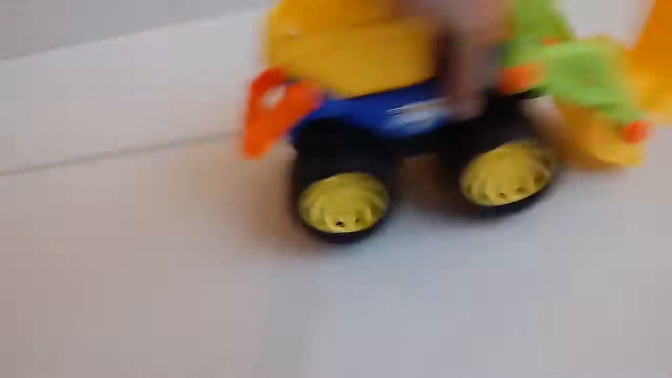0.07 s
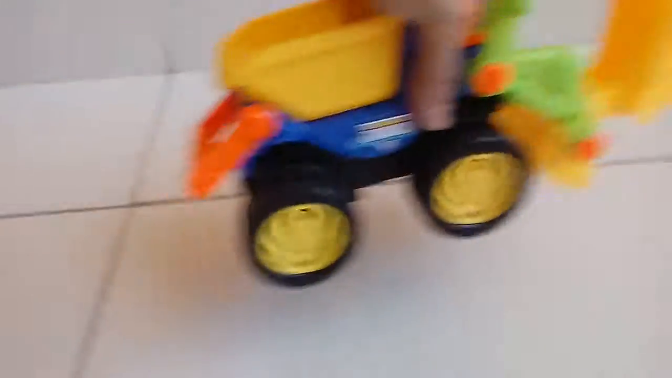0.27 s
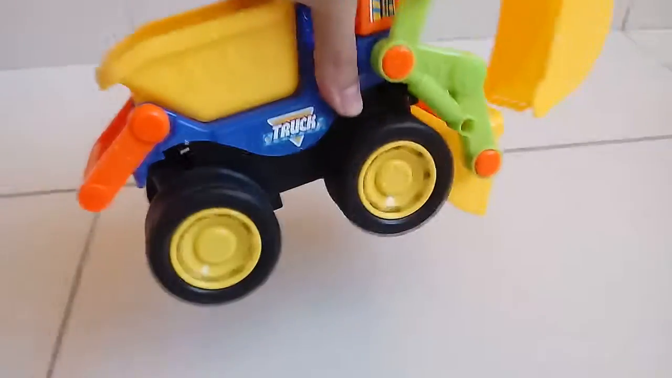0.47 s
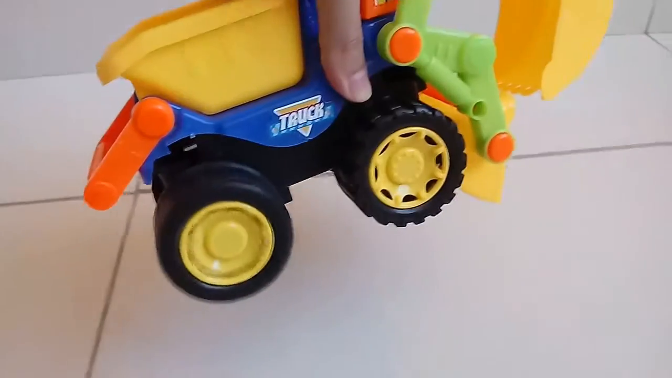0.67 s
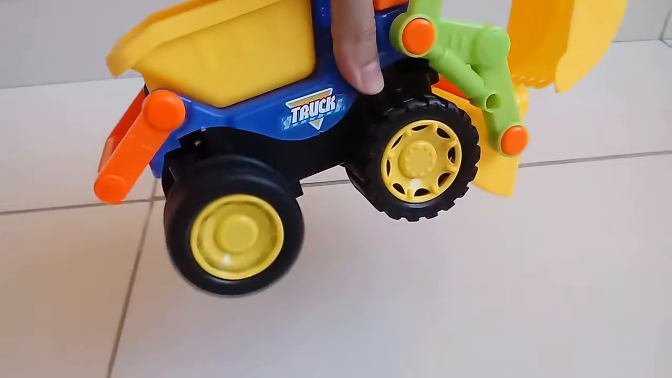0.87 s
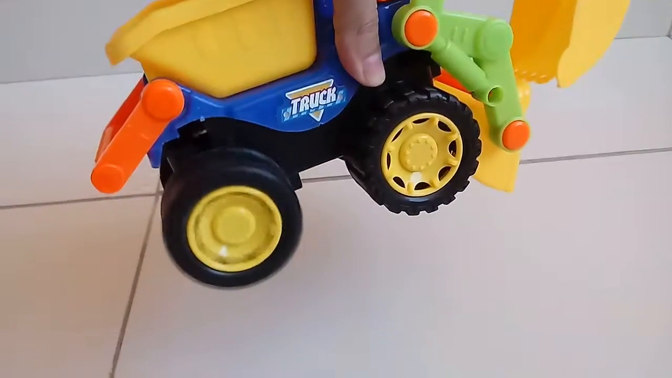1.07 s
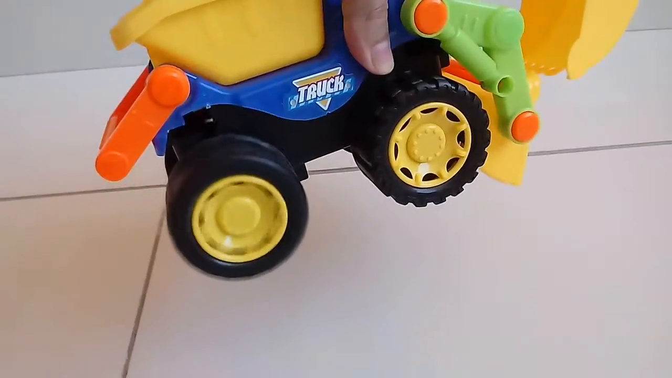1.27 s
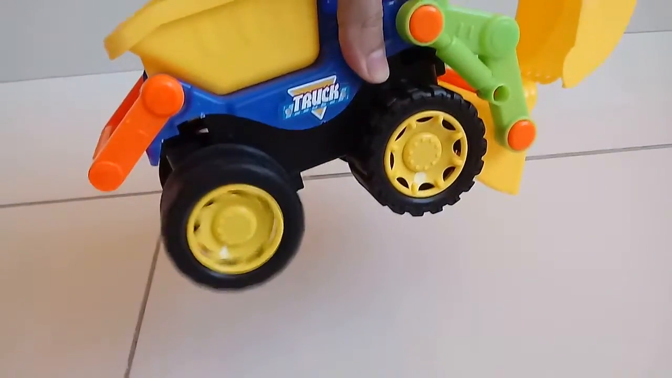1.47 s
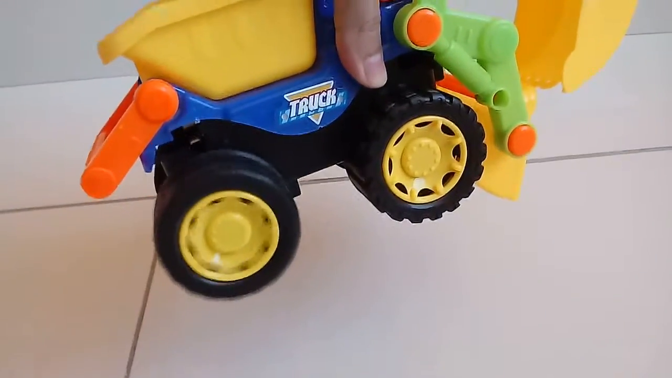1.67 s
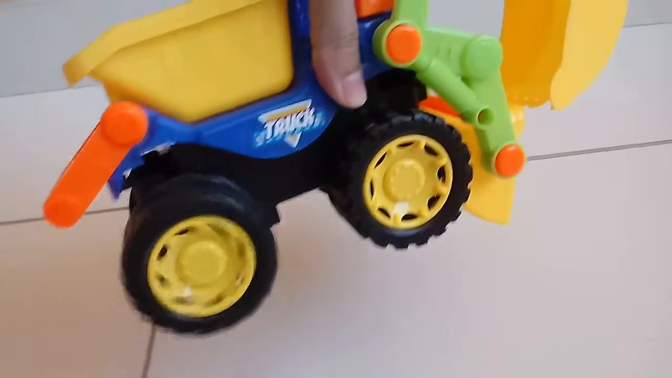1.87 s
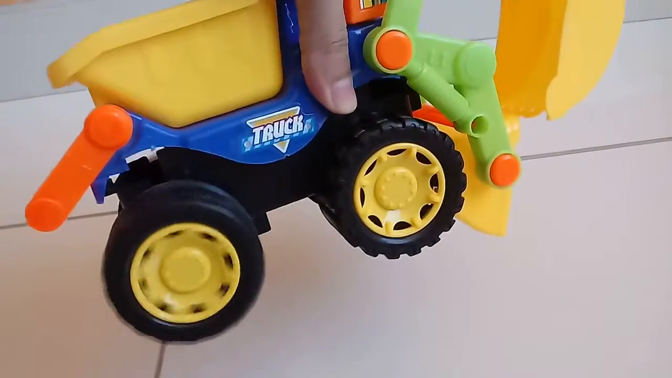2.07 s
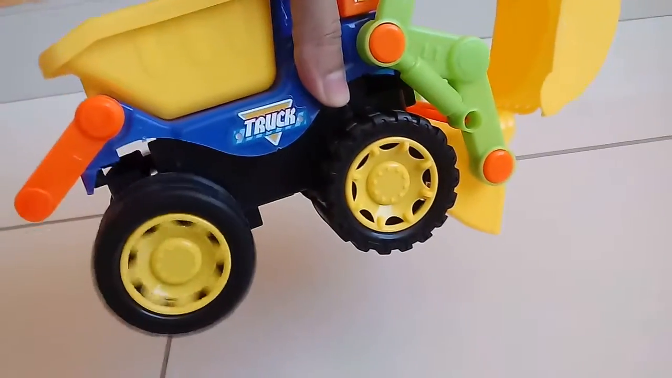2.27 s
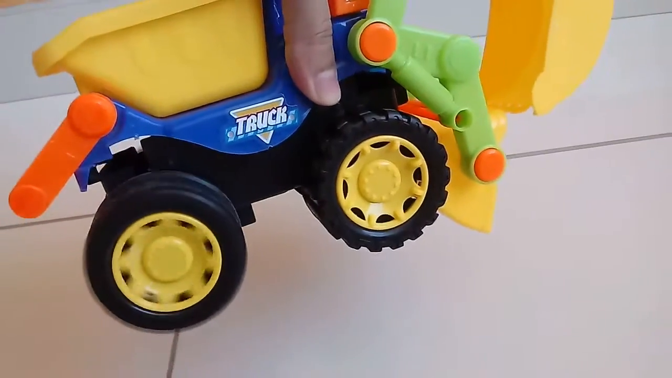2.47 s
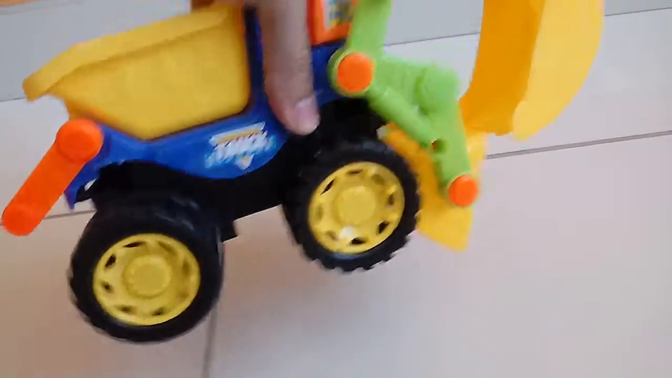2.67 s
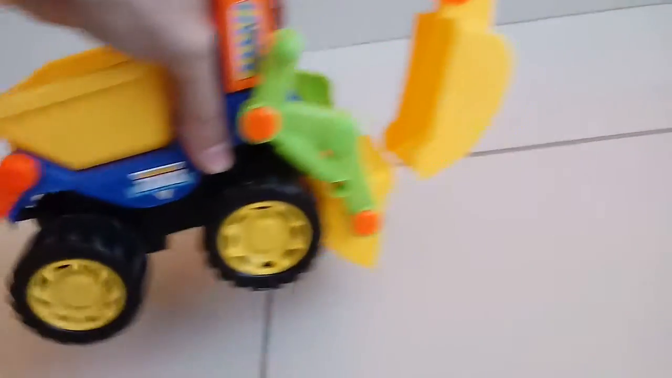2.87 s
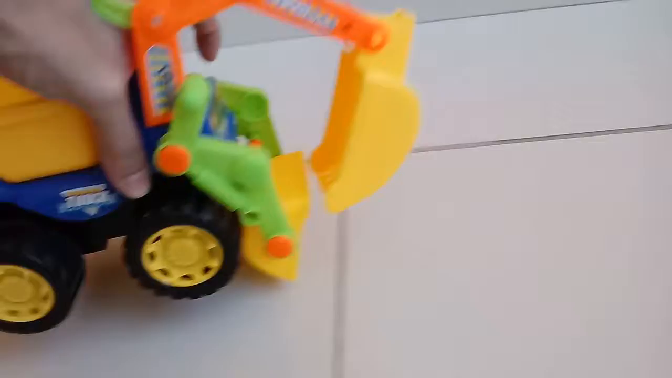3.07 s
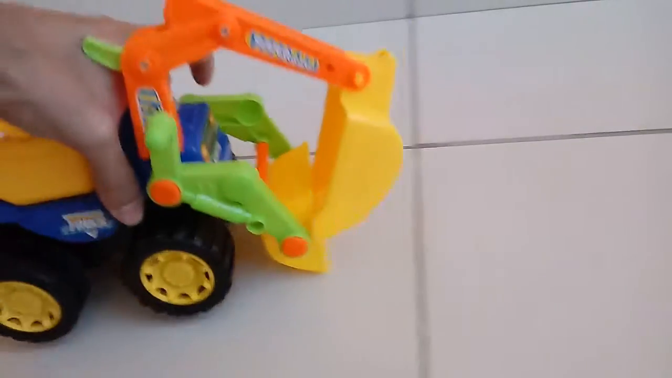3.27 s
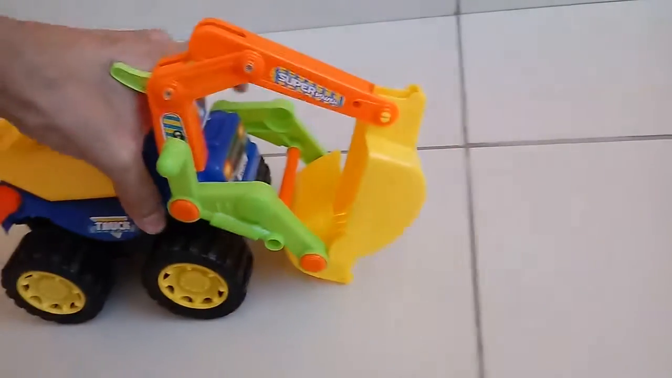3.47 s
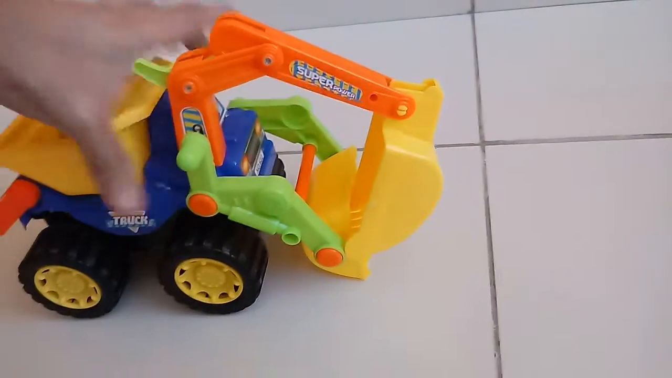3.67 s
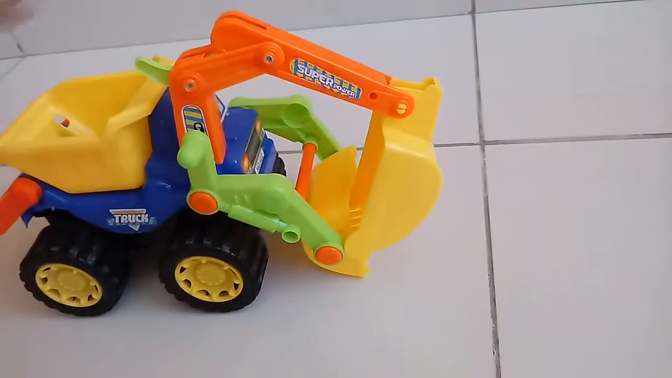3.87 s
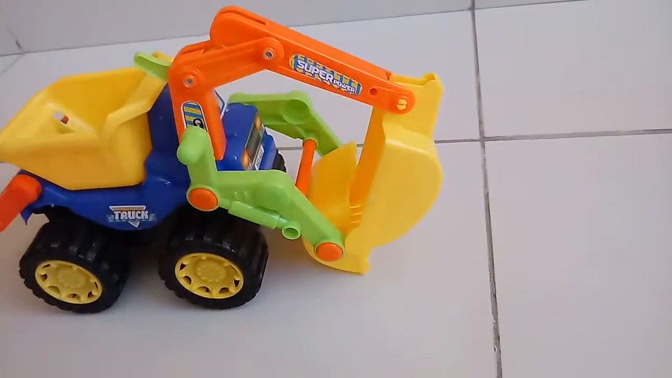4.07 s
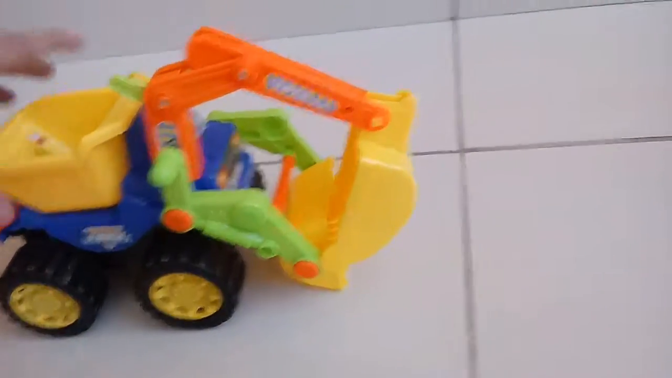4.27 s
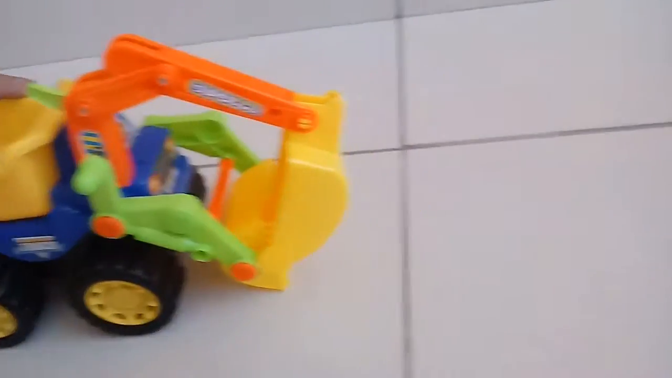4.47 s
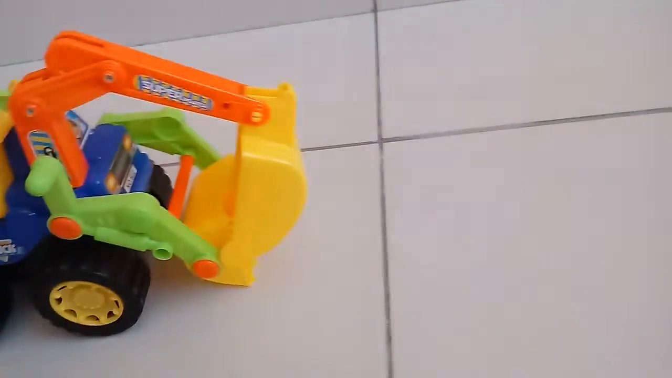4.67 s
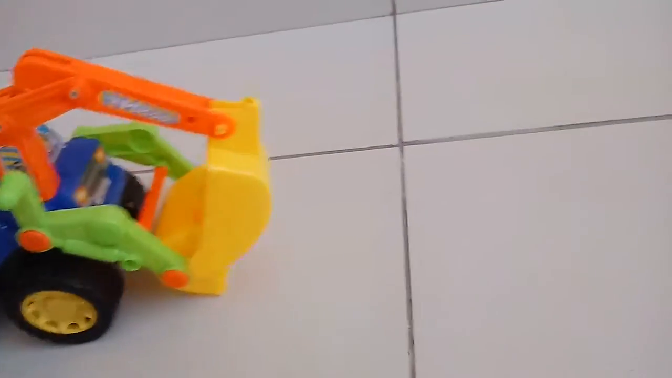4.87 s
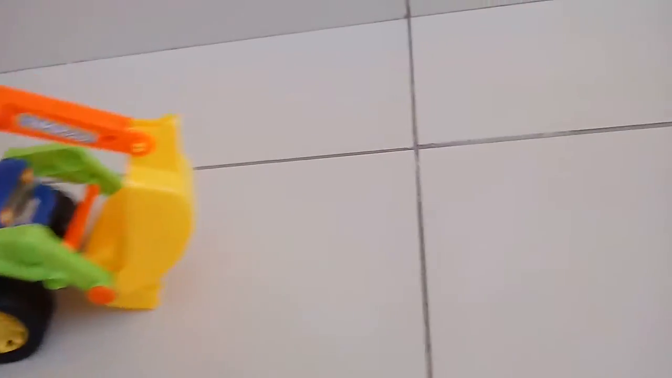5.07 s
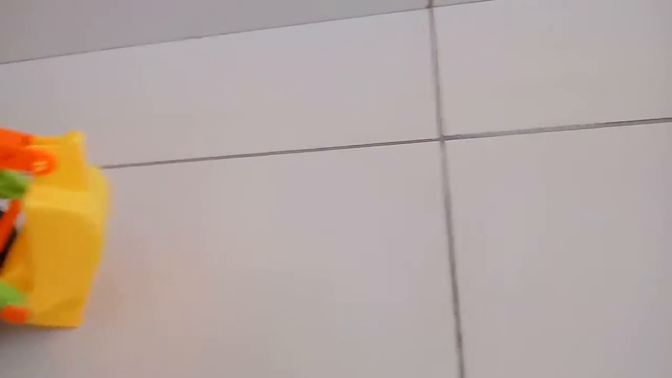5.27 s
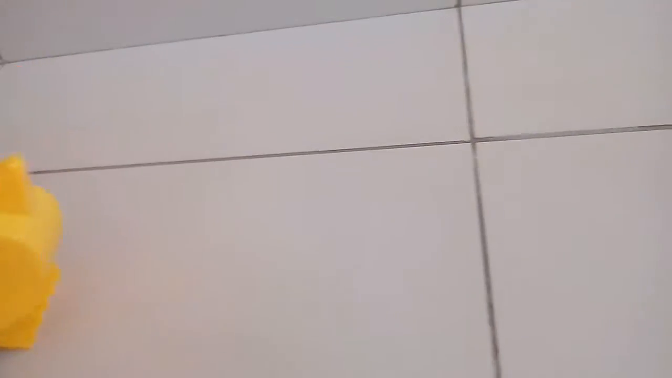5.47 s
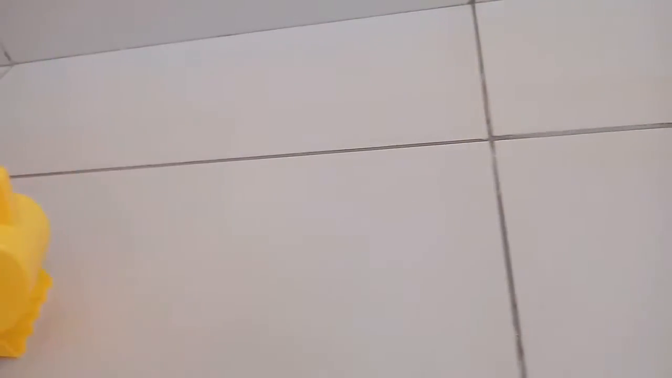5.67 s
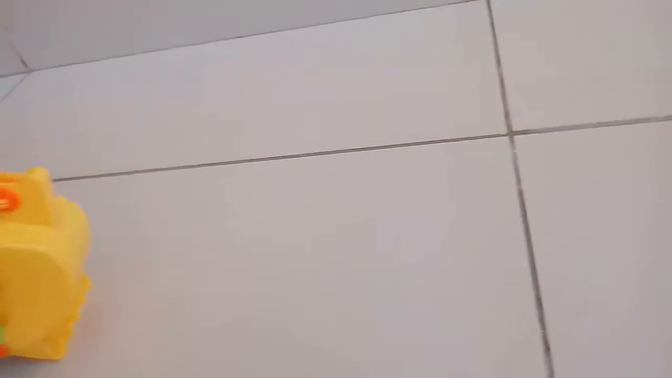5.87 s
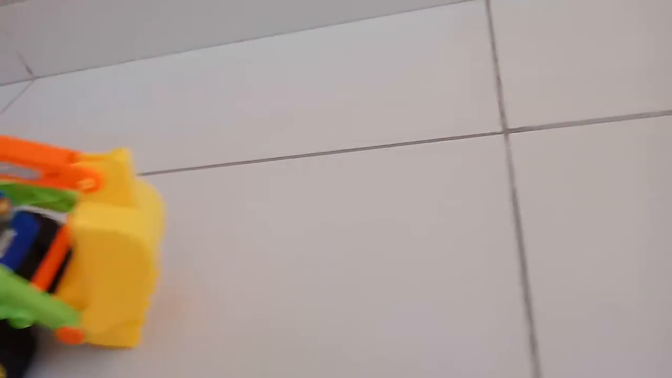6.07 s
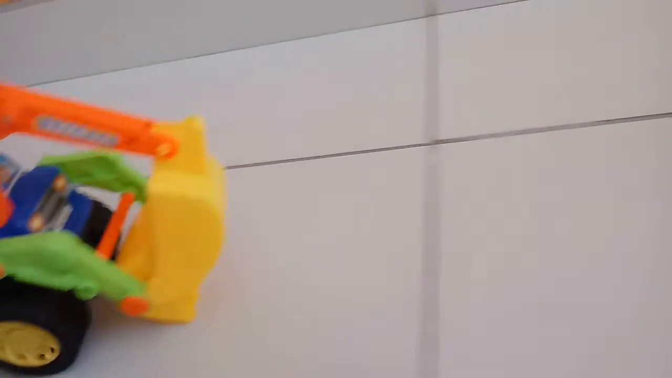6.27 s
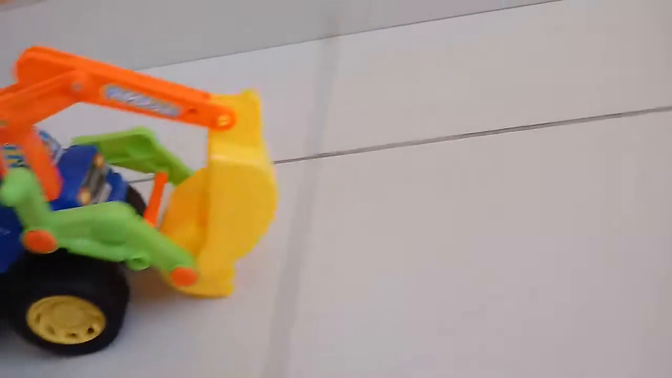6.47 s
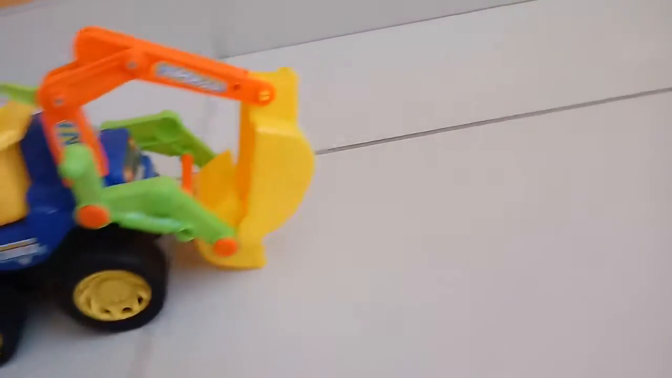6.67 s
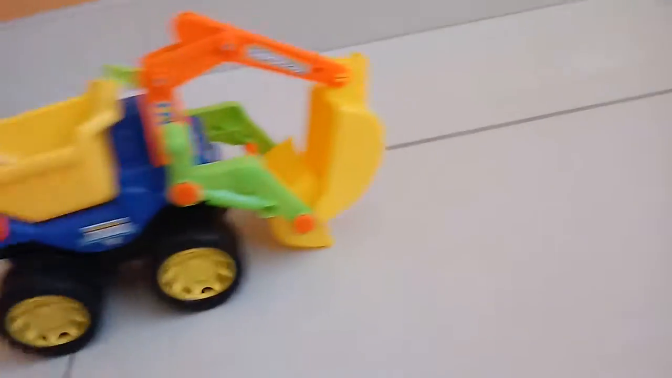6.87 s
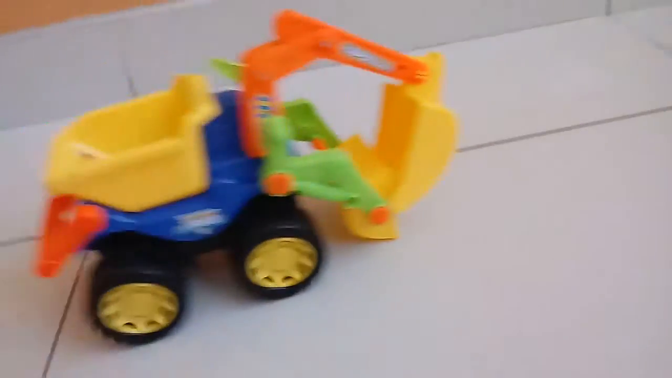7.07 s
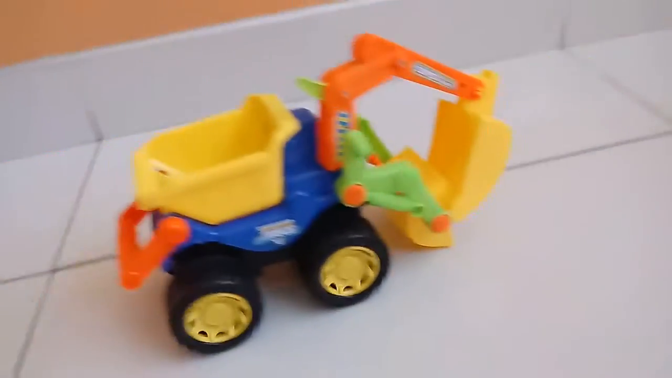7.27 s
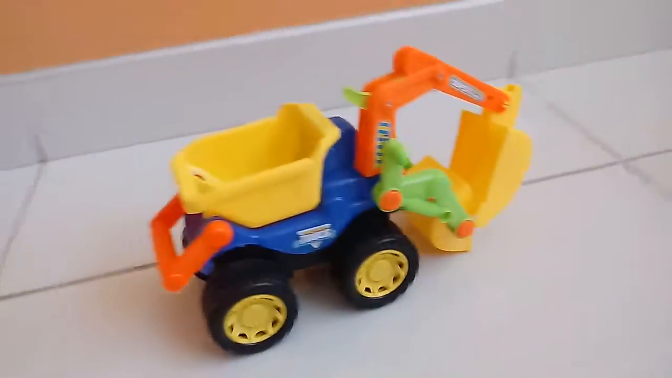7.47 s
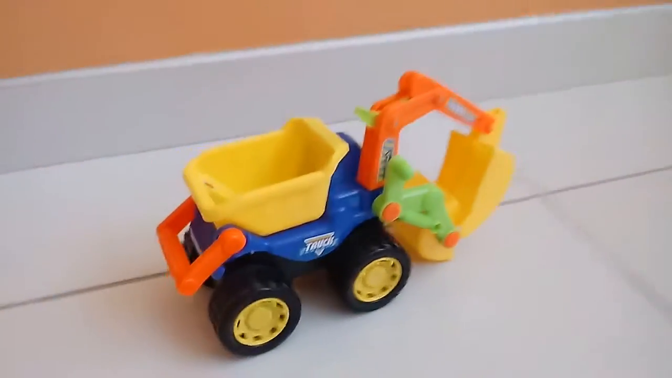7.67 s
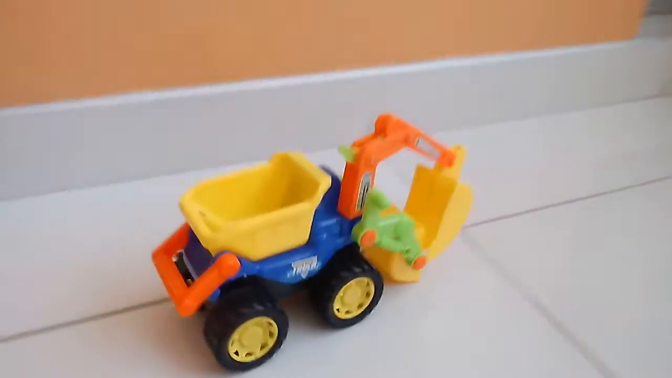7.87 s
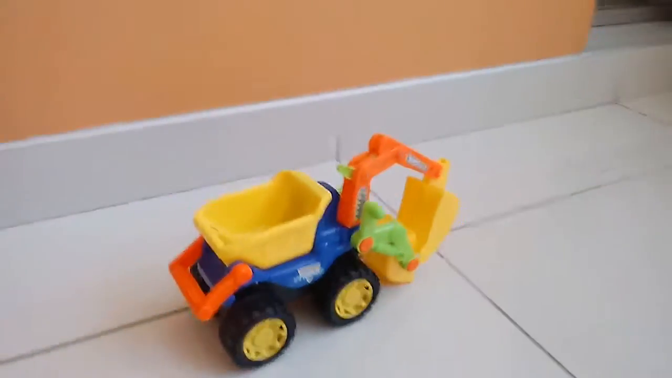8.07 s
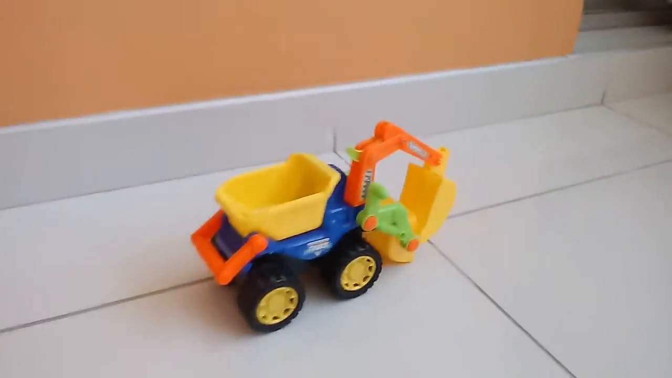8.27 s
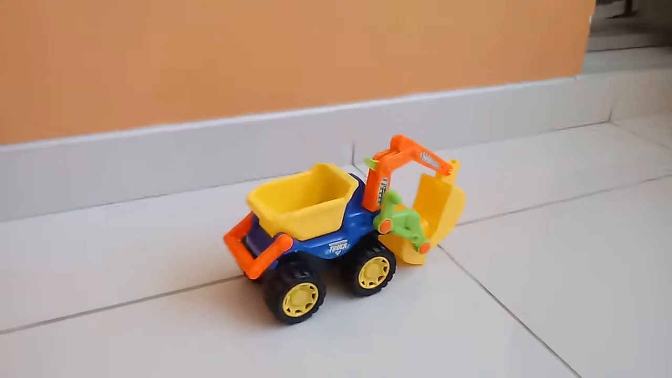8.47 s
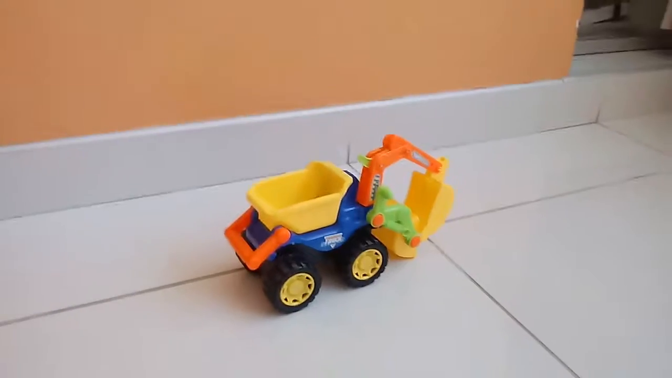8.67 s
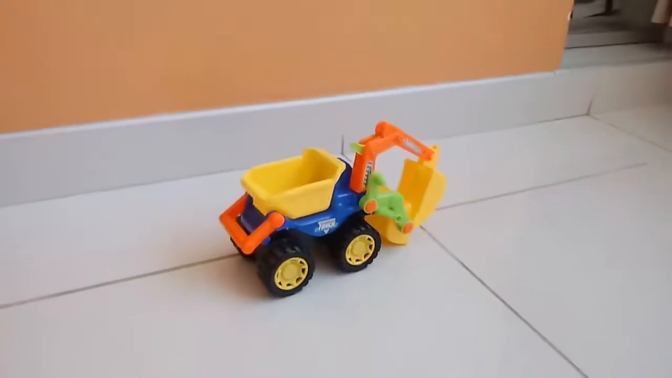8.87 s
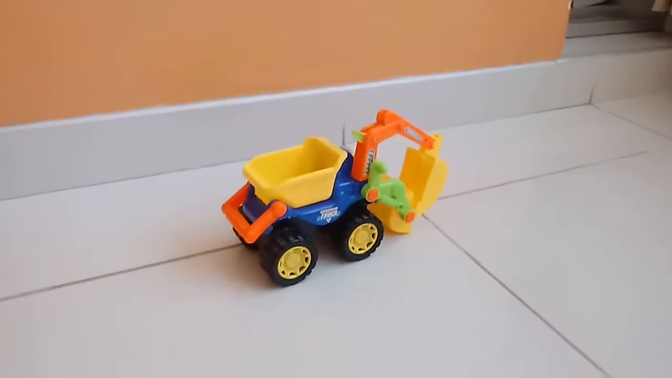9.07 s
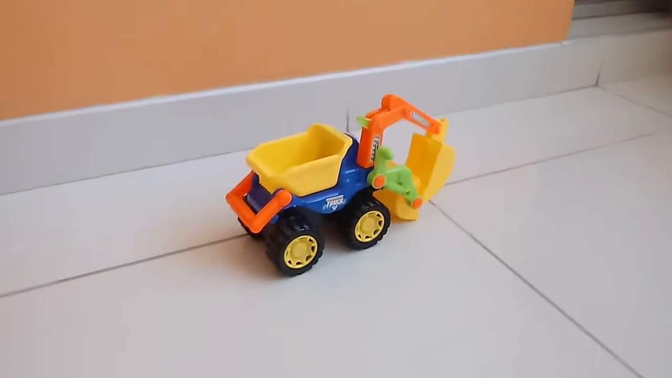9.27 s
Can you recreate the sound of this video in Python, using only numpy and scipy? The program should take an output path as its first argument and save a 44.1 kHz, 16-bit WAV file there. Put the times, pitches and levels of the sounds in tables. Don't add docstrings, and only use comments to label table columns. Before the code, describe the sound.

A burst of loose plastic clatter opens, then a flywheel toy's toothy whir winds down over three seconds, broken by dull finger knocks and a squeak. The truck is set on a tiled floor with clacks. Faint rubs and a creak follow, then a duller grinding pull-back, a fast rising rattle on release and a slowing ticking roll. Quiet hum and faint high buzz remain, with slight reverberation.

```python
import sys
import numpy as np
from scipy import signal
from scipy.io import wavfile
from scipy.ndimage import uniform_filter1d

SR = 44100
rng = np.random.default_rng(int(sys.argv[2]) if len(sys.argv) > 2 else 0)


def wav_record(signal):
    frames = np.transpose(np.atleast_2d(signal))
    bounded = np.clip(frames, -1, 1)
    quanta = np.round(bounded * 32767).astype(np.int16)
    wavfile.write(sys.argv[1], SR, quanta)


def how_loud(loudness_db):
    steps = np.asarray(loudness_db, float) / 20
    return 10 ** steps


N = 411453
TIME = np.arange(N) / SR
GRID = np.fft.rfftfreq(4096, 1 / SR)

# t/s,
# tooth rate f/Hz, gear level/dB
WHIR_DOWN = [(.15, 1004, -21), (.66, 885, -17.5), (.72, 837.7, -18), (.85, 775.5, -18.5),
             (1.01, 741.8, -17.5),
             (1.27, 609.3, -18.5), (1.38, 578.8, -18), (1.79, 446.5, -20), (2.3, 379.1, -21),
          (3.19, 269.5, -26)]
SET_DOWN = [(3.229, 265.2, -40), (3.27, 262.8, -27.5), (3.41, 248.2, -27), (3.56, 237.3, -34),
            (3.62, 226, -49), (4.0, 194.8, -85)]
PULL_BACK = [(4.69, 45, -51.5), (4.751, 70.4, -37), (4.961, 191, -30), (5.059, 210, -29),
             (5.191, 215.7, -28), (5.38, 228.2, -29), (5.539, 214, -29.5), (5.67, 150, -36.5),
             (5.802, 60.6, -51.5)]
RUN_UP = [(5.859, 41.5, -48), (5.92, 75.8, -38), (5.996, 153.4, -32.5), (6.06, 211.4, -28.5),
          (6.259, 389.5, -26), (6.451, 471.4, -23), (6.599, 515, -22), (6.659, 515, -21.5)]
COAST = [(6.861, 447.7, -22.5), (7.02, 414, -22), (7.22, 364.2, -26), (7.35, 319.9, -27.5),
         (7.481, 309.8, -26.5), (7.63, 267.4, -29), (7.92, 230.6, -30.5), (8.289, 119.6, -41.5),
         (8.52, 40.5, -60)]
DRIVE = WHIR_DOWN + SET_DOWN + PULL_BACK + RUN_UP + COAST
LIFTED = [(.2,), (3.44,)]
TUGGED = [(4.5,), (5.2,)]
PULLED = [(5.0,), (5.9,)]
DRIVEN = [(5.75,), (6.6,)]
# start t/s, end t/s, regular share [0-1], fading t/s
STEADY_RUNNING = [
    (.13, 1.05, .66, .35),
    (.11, 2.3, .43, .2),
    (1.92, 3.68, .9, .5),
    (5.08, 5.75, .4, .25),
    (6.42, 8.1, .55, .6),
]
# from t/s, first tooth meets t/s
MESH_PHASE = [
    (0, 2.605),
    (5.83, 5.888),
    (6.8, 7.207),
]
PINION_DB = [6, 6, -3, -4, -3, -5, -8, -5]
PINION_LATE = [0, .9, 1.3, .2, -.8, -1.3, -.6, .3]

HOUSING_IN_AIR = [(1580, 106, -11), (2050, 160, -2.5), (2350, 140, -13), (3030, 320, -8), (3640, 230, -9.5),
                  (4180, 520, -5.5), (6700, 450, -6.5), (7560, 380, -16), (8700, 590, -26.5),
                  (10640, 330, -19)]
HOUSING_ON_FLOOR = [(2035, 134, 7.5), (2850, 120, 1.5), (3340, 88, 0.5), (4460, 3000, -3), (5050, 210, 6.5),
                    (6590, 290, 6.5), (7380, 200, -4.5)]
PLATE_IN_AIR = [(3500, 110, -17), (4330, 280, -12), (5090, 690, 2), (6640, 152, 2)]
PLATE_ON_FLOOR = [(3500, 320, 0.5), (4150, 720, 9.5), (5180, 580, -0.5), (6760, 120, -1.5),
                  (10700, 290, -6)]
TUGGED_RINGS = [(3500, 420, -3.5), (4180, 430, -0.5), (4900, 450, -4), (5800, 470, -3), (2030, 150, -17)]
PUSHED_RINGS = [(2036, 110, 1), (3070, 160, 0), (4020, 340, -5), (4900, 360, 3.5), (5740, 200, 0),
                (6540, 430, 1)]
CRAWL_RINGS = [(2050, 740, 2.5), (3520, 1100, -1.5), (4400, 120, 0), (6780, 380, 1.5)]
BODY_ON_FLOOR = [(720, 440, 6), (895, 660, 8), (1130, 220, 10.5), (1720, 480, 3.5), (3140, 2200, -1.5),
                 (5070, 440, 2), (5840, 270, -0.5)]
BODY_HELD = [(875, 215, -1), (1520, 460, -3)]
HUM_RINGS = [(73.5, 27, 6), (32, 25, -23)]

# f/Hz, level/dB per Hz. Sliding teeth; rubbing; hand tremor; room air
SCRAPE_SPECTRUM = [(400, -9), (900, -1.5), (2000, -9), (3200, 0.5), (4300, 1.5), (5300, -0.5), (6100, -2.5),
                   (6800, -10.5), (8300, -14), (10500, -10.5), (11500, -34)]
RUB_SPECTRUM = [(290, -57), (500, -42), (1920, -3), (2520, -8.5), (3060, -7), (3910, -11), (6560, -15),
                (11000, -21), (14300, -55), (22000, -120)]
TREMOR_SPECTRUM = [(47, -16), (80, -13), (113, 3.5), (161, 2), (210, 0), (400, -5), (520, -12), (880, -120)]
AIR_SPECTRUM = [(65, -37), (110, -1), (192, -9.5), (467, -27.5), (555, -20), (648, -22), (881, -20.5),
                (2270, -29), (6050, -33.5), (11000, -43.5), (14300, -80), (22000, -120)]

# t/s, level/dB, fading t/s
PLATE_SHAKES = [
    (6.85, -2, 0.16),
    (7.25, 0.5, 0.16),
    (7.55, 2, 0.079),
    (7.85, 2, .08),
]
# t/s, overtone [number], level/dB, half length t/s
SINGS = [(0.222, 3, -21.5, 0.077), (0.477, 4, -19, 0.28), (6.707, 13, -32, 0.076),
         (6.704, 14, -26.5, 0.048), (7.035, 8, -31.5, 0.027), (7.584, 7, -33.5, 0.075),
         (.45, 2, -27.5, 0.22), (0.79, 2, -30.5, 0.1), (0.97, 2, -37, 0.061), (5.39, 9, -35.5, 0.22),
         (2.68, 6, -30, .08), (.78, 5, -24, 0.1), (0.928, 4, -39, 0.089), (.98, 5, -29, 0.13),
         (1.16, 6, -29, .1), (1.36, 6, -27, 0.082), (6.66, 10, -36, 0.14)]
# t/s, overtone [number], level/dB, half length t/s
SIDE_SINGS = [(.35, 4.25, -27, .09), (.4, 4.125, -31, .12), (.56, 4.125, -31, .05), (.75, 4.875, -31, .07),
              (1.15, 6.25, -32, .08)]
# t/s, half length t/s, f/Hz, point of the turn [0-1], level/dB
TURN_RINGS = [(6.7, .1, 3860, 0.2, -26), (6.92, .1, 4800, 0.2, -28), (7.267, .2, 4120, .15, -22.5),
              (7.3, .25, 4050, 0.66, -25), (7.558, .08, 4100, 0.17, -22.5), (7.75, .12, 4230, .15, -31),
              (7.12, 0.17, 5050, 0.58, -22), (7.4, 0.14, 5050, 0.5, -28), (2.6, .2, 5100, 0.18, -25),
              (2.95, 0.148, 5030, .12, -23.5), (3.326, .06, 5000, 0.1, -28)]
# t/s, level/dB, fading t/s
JOLTS = [(.04, -33, 0.011), (.11, -33, 0.0079), (.2, -23.5, 0.18), (.85, -24.5, 0.015),
         (1.27, -22.5, 0.058), (1.71, -20.5, 0.11), (2.36, -25, 0.03), (3.22, -26, 0.011),
         (3.28, -28.5, 0.033), (3.42, -28.5, 0.087), (3.635, -36, 0.044), (3.72, -40, 0.11),
         (4.8, -36, 0.083), (5.13, -30.5, 0.061), (6.24, -27, 0.037), (6.57, -22.5, 0.027),
         (6.81, -21, 0.057), (7.43, -24, 0.02), (7.85, -27.5, 0.0075)]

# t/s, peak level/dB, ring f/Hz, t60 t/s
THUMPS = [(0.329, -12.5, 142, 0.019), (0.397, -8, 330, 0.03), (.446, -11, 307, 0.08),
          (0.498, -19, 133, 0.084), (1.72, -9.5, 306, 0.048), (1.728, -20.5, 123, 0.13),
          (1.762, -20, 267, 0.057), (2.061, -24, 355, 0.11), (2.068, -9.5, 253, 0.04),
          (2.098, -20, 285, 0.052), (2.317, -0.5, 98, 0.012), (2.385, -3.5, 258, 0.02),
          (3.704, -18, 460, 0.012), (3.707, -21, 91.5, 0.041), (3.778, -28, 172, 0.11),
          (4.068, -11.5, 160, 0.032), (4.102, -29, 100, 0.054), (4.319, -19.5, 104, 0.069),
          (4.498, -25, 99, 0.071), (4.676, -9.5, 97.6, 0.023), (5.077, -24.5, 153.7, 0.14),
          (5.286, -25, 115.9, 0.12), (5.465, -8, 98, 0.016), (5.653, -30, 115.8, 0.064),
          (5.67, -19, 413, 0.011), (9.057, -47.5, 480, 0.05), (9.202, -30, 573, 0.046),
          (9.248, -34, 356, 0.066), (9.275, -30, 91, 0.043)]
# t/s, peak level/dB, main ring f/Hz, t60 t/s, relative crack level/dB
CLACKS = [(.033, -7, 1050, 0.027, -10), (.087, -13, 1030, 0.026, -9), (.107, -7, 1180, 0.028, -12),
          (1.702, -6.5, 2350, 0.029, -24), (2.3053, -11, 2754, 0.012, 6), (2.3141, -9.5, 1050, 0.021, 2),
          (3.206, -20.5, 1330, 0.012, 15), (3.217, -3, 1530, 0.013, -15), (3.3947, -14, 2740, .025, -2),
          (3.408, -11.5, 4450, .02, -18), (3.4281, -16.5, 1650, 0.016, 9), (3.633, -16.5, 2270, 0.015, 2.5),
          (3.6668, -14, 1130, 0.02, -3), (3.7264, -22.5, 1580, 0.029, -16),
          (4.0657, -32.5, 720, 0.029, 5.5), (4.3292, -24.5, 810, 0.0046, -2), (4.3865, -29, 1700, 0.019, 2),
          (4.4364, -42, 2220, 0.025, 2), (4.5516, -34.5, 1180, 0.017, 3), (4.7223, -28, 770, 0.049, 4),
          (7.9328, -11, 1200, .015, -3.5), (7.853, -18, 2050, .02, -12), (9.2025, -29.5, 973, 0.046, -33)]
# t/s, peak level/dB, main
# ring f/Hz
BUMPS = [(5.007, -17, 1633), (5.0406, -17, 1200), (5.153, -18, 3500), (5.2416, -16, 1210),
         (5.464, -24, 1110), (6.165, -11, 1603), (6.244, -17, 1200), (6.4036, -13, 1600),
         (6.5673, -21, 1121), (6.809, -12, 1160), (6.68, -14.5, 1770), (6.94, -11, 3140),
         (7.401, -15, 3220), (7.769, -15, 1410), (7.8332, -15.5, 3230), (8.188, -22.5, 1520),
         (5.946, -24, 1090), (5.983, -22, 1080), (6.1086, -16, 1170), (6.1285, -16, 1570),
        (6.1998, -17, 1570), (6.228, -15, 1520), (6.2574, -15, 1610), (6.3125, -17, 1570),
        (6.333, -12, 1648), (6.353, -18, 1490), (6.431, -22, 1163), (6.455, -16, 1720), (6.499, -9.5, 1135),
        (6.53, -14, 1460), (4.7417, -23.5, 5800), (4.7662, -25, 1210), (4.809, -26, 940), (4.832, -20, 900),
        (4.88, -22, 820), (5.188, -21, 1200), (5.606, -21, 1080), (5.083, -24, 800), (5.121, -20, 1186),
        (5.312, -22, 1250), (5.344, -20, 1250), (7.657, -24, 1400), (7.692, -19, 1426), (7.843, -18, 800),
        (8.1, -24, 810), (8.305, -30.5, 935)]
SLAPS = [(0.0054, -9, 3340), (0.0124, -10, 3330), (0.0249, -1, 4230), (0.0368, -1, 3270),
         (0.0444, -1, 3170), (0.05, -3, 4950), (0.0594, -2.5, 4340), (0.0714, -4, 5040),
         (0.0765, 2.5, 3140), (0.0894, 0.5, 4790), (0.0968, -4, 4900), (0.11, -11, 3200),
         (0.1245, -0.5, 2850)]

# t/s, f/Hz, level/dB
SQUEAK = [(1.818, 1928, -16), (1.83, 1980, -16.5), (1.842, 2164, -18), (1.884, 2135, -15.5),
          (1.894, 2023, -14.5), (1.903, 1790, -14), (1.926, 1704, -13), (1.948, 1500, -21.5),
          (1.965, 1460, -19)]
CREAK = [(4.53, 176, -26), (4.558, 174.4, -33), (4.57, 170.5, -22), (4.583, 162.4, -33),
         (4.6, 161.4, -22.5), (4.625, 186, -28), (4.648, 212, -25), (4.665, 208.4, -26), (4.69, 201, -34)]
# t/s, half length t/s, depth [0-1]
SQUEAK_GAPS = [(1.84, .003, .5), (1.865, .005, 1), (1.883, .002, .8), (1.931, 0.0017, .7)]
# start t/s, end t/s, from f/Hz, to f/Hz, level/dB
STRANDS = [(1.817, 1.836, 1630, 1770, -21), (1.818, 1.83, 2320, 2500, -26),
           (1.833, 1.87, 1400, 1470, -27.5), (1.853, 1.875, 2600, 2350, -24),
           (1.92, 1.956, 2610, 2190, -22), (1.928, 1.946, 3320, 3020, -28),
           (1.921, 1.948, 1754, 1750, -20.5), (1.977, 2, 1670, 1670, -30)]
# start t/s, length t/s, level/dB at contact, level change over the stroke [dB]
RUBS = [(2.298, 0.066, -11.5, -24), (3.23, 0.11, -25, -7.5), (4.13, 0.075, -46, 1),
        (4.375, 0.12, -46.5, -6), (8.64, 0.31, -50, -0.5), (9.196, 0.14, -42, -21),
        (8.628, 0.048, -41, -16), (4.168, 0.042, -38, -3), (4.58, 0.094, -39, -2), (4.34, 0.0516, -58, 3),
        (4.465, 0.085, -48, 6), (4.54, 0.11, -57, 2), (4.3, .08, -51, 1)]
# ring f/Hz, width/Hz, relative level/dB of the broad hiss
RUB_TONES = [(515, 850, 2.5), (1410, 290, -2), (3100, 480, 6), (3000, 3600, 16), (2830, 5900, 1),
             (800, 740, -11), (2790, 1600, 14), (730, 600, -17), (480, 210, -29), (2500, 1600, 0),
             (7940, 6700, 4), (2500, 3000, -5), (3000, 3000, 0)]
# t/s, peak level/dB, length t/s
SWAYS = [(0.303, -25.5, 0.013), (0.388, -25, 0.0062), (0.48, -27, 0.017), (2.337, -14.5, 0.0071),
         (2.62, -30.5, 0.011), (2.646, -33, 0.018), (4.344, -29, 0.0078)]
# t/s, level/dB
SHIFTS = [(.39, -34), (.91, -57), (1.61, -46), (2.2, -55), (5.0, -41), (5.35, -44), (6.3, -44.5),
          (6.99, -47)]


def evened(x):
    return x / np.sqrt(np.mean(x ** 2) + 1e-20)


def noise():
    return rng.standard_normal(N)


def drift(samples):
    once = uniform_filter1d(noise(), samples)
    return evened(uniform_filter1d(once, samples))


def read(points, hz):
    f, value = np.transpose(points)
    return np.interp(np.log(hz + 1), np.log(f + 1), value)


def columns(rows):
    s, *values = np.transpose(rows)
    return [np.interp(TIME, s, v) for v in values]


def during(rows, fade):
    return np.clip(np.minimum(TIME - rows[0][0], rows[-1][0] - TIME) / fade, 0, 1)


def bursts(rows):
    t = TIME[::32]
    power = sum(how_loud(2 * db) * np.exp(-2 * abs(t - s) / max(fading, .003)) for s, db, fading in rows)
    return np.interp(TIME, t, np.sqrt(power))


def coloured(x, gain):
    log_gain = np.log(np.r_[gain, gain[-2:0:-1]] + 1e-5)
    spectrum = np.exp(np.conj(signal.hilbert(log_gain)))
    taps = np.fft.ifft(spectrum).real[:3000]
    return evened(signal.oaconvolve(x, taps)[:N])


def rings(peaks, hz):
    power = sum(how_loud(2 * db) / (1 + (2 * (hz - f) / width) ** 2) ** 1.6 for f, width, db in peaks)
    return np.sqrt(power)


def patchy(x, patch_db):
    z = signal.stft(x, nperseg=512)[2]
    patches = uniform_filter1d(rng.standard_normal(z.shape), size=5, axis=0)
    patches = uniform_filter1d(patches, size=16, axis=1)
    return evened(signal.istft(z * how_loud(patch_db * evened(patches)), nperseg=512)[1][:N])


def steadiness():
    settle_s, loaded_share = .15, .07
    free = []
    for start, end, share, fading in STEADY_RUNNING:
        window = np.minimum((TIME - start) / settle_s, (end - TIME) / fading)
        free.append(share * np.clip(window, 0, 1))
    return np.maximum(np.max(free, axis=0), loaded_share)


def meshing(hz):
    teeth = np.cumsum(hz * (1 + .0006 * drift(2000))) / SR
    for start, meets in MESH_PHASE:
        to_first_tooth = -teeth[round(meets * SR)] % len(PINION_DB)
        teeth = teeth + (TIME >= start) * to_first_tooth
    return teeth


def tooth_impulses(teeth, hz, regular):
    whole = np.floor(teeth).astype(int)
    at = np.flatnonzero(np.diff(whole)) + 1
    tooth = whole[at] % len(PINION_DB)
    chance = rng.standard_normal((len(at), 2))
    late = (teeth[at] % 1) / hz[at] * SR
    late += (.15 + .5 * (hz[at] / 1000) ** 2) * chance[:, 1]
    late += (1.4 * (1.05 - regular) * drift(250))[at]
    reach = np.arange(-8, 9)
    taper = np.hanning(19)[1:-1]
    tick = np.sinc(reach - late[:, None]) * taper * how_loud(1.5 * chance[:, :1])
    knock_late = late - np.take(PINION_LATE, tooth)
    knock = np.sinc(reach - knock_late[:, None]) * taper
    knock *= how_loud(np.take(PINION_DB, tooth) + 1.1 * chance[:, 0])[:, None]
    even, uneven = np.zeros((2, N + 16))
    np.add.at(even, at[:, None] - reach + 8, tick)
    np.add.at(uneven, at[:, None] - reach + 8, knock)
    steady = np.sqrt(hz / SR)
    return even[8:-8] / steady, uneven[8:-8] / steady


def mesh_ticks(teeth, hz, regular):
    even, uneven = tooth_impulses(teeth, hz, regular)
    lifted = during(LIFTED, .08)
    no_bass = 1 / (1 + (1300 / (GRID + 1)) ** 4)
    ticks = lifted * coloured(even, rings(HOUSING_IN_AIR, GRID) * no_bass)
    ticks += (1 - lifted) * coloured(even, rings(HOUSING_ON_FLOOR, GRID))
    ticks += lifted * how_loud(-5.5) * coloured(uneven, rings(PLATE_IN_AIR, GRID))
    floor_gain = np.hypot(how_loud(-4.5), bursts(PLATE_SHAKES))
    ticks += (1 - lifted) * floor_gain * coloured(uneven, rings(PLATE_ON_FLOOR, GRID))
    return patchy(evened(ticks), 1.8)


def sliding_teeth(teeth, hz, regular):
    wobble = np.cos(2 * np.pi * teeth / len(PINION_DB))
    hiss = coloured(noise() * how_loud(0.31 * wobble + 2.0 * drift(150)), how_loud(read(SCRAPE_SPECTRUM, GRID)))
    loose = noise() * how_loud(3.3 * drift(40) + drift(300) + 5 * regular * wobble)
    puff_length = np.maximum(hz * 0.002, 0.44)
    puffs = 1 + how_loud(12) * np.exp(-(teeth % 1) / puff_length)
    puffs = puffs / np.sqrt(uniform_filter1d(puffs ** 2, size=2000))
    puffing = loose * puffs
    loaded = np.maximum(during(DRIVEN, .05), during(PULLED, .2))
    tugged = during(TUGGED, .2)
    crawl = np.clip((TIME - 7.72) / .3, 0, 1)
    unloaded = np.maximum(1 - loaded - tugged, 0) * np.sqrt(1 - crawl)
    chatter = unloaded * coloured(loose, rings(HOUSING_IN_AIR[1:2] + PLATE_ON_FLOOR[:-1], GRID))
    chatter += np.sqrt(tugged) * coloured(puffing, rings(TUGGED_RINGS, GRID))
    chatter += np.sqrt(loaded) * coloured(puffing, rings(PUSHED_RINGS, GRID))
    chatter += np.sqrt(crawl) * coloured(puffing, rings(CRAWL_RINGS, GRID))
    return patchy(np.sqrt(.25 + .6 * regular) * hiss + np.sqrt(.75 - .6 * regular) * chatter, 2)


def singing_panels(teeth):
    wobble = np.cos(2 * np.pi * teeth / len(PINION_DB))
    flutter = (1 + 0.32 * drift(60)) * (1 + 0.23 * wobble) * how_loud(1.5 * drift(900))
    out = np.zeros(N)
    whole_overtones = [(s, round(k), db, half) for s, k, db, half in SINGS]
    for s, k, db, half in whole_overtones + SIDE_SINGS:
        now = slice(max(round((s - 2 * half) * SR), 0), round((s + 2 * half) * SR))
        swell = np.exp(-((TIME[now] - s) / half) ** 4)
        out[now] += flutter[now] * how_loud(db) * swell * np.cos(2 * np.pi * (k * teeth[now] - .25))
    return out


def struck_plate(teeth):
    wander, turn, out = drift(200), teeth / len(PINION_DB), np.zeros(N)
    for s, half, hz, point, db in TURN_RINGS:
        now = slice(round((s - 2 * half) * SR), round((s + 2 * half) * SR))
        from_point = (turn[now] - point + .5) % 1 - .5
        struck = np.exp(-(from_point / 0.1) ** 2 - ((TIME[now] - s) / half) ** 4)
        per_tooth = 1 + .6 * np.cos(2 * np.pi * (teeth[now] - .15))
        tone = np.sin(2 * np.pi * np.cumsum(hz * (1 + .03 * wander[now])) / SR)
        out[now] += how_loud(db + 2.6 * wander[now][::-1]) * struck * per_tooth * tone
    return out


def gears():
    hz, level_db = columns(DRIVE)
    regular, teeth = steadiness(), meshing(hz)
    ticks = np.sqrt(regular) * mesh_ticks(teeth, hz, regular)
    scrape = np.sqrt(1 - regular) * sliding_teeth(teeth, hz, regular)
    return how_loud(level_db) * (ticks + scrape) + singing_panels(teeth) + struck_plate(teeth)


def tyres():
    hz, gear_db = columns(DRIVE)
    rolling = how_loud(gear_db - 2 + 1.2 * drift(1500))
    level = np.hypot(rolling * (1 - steadiness()) ** 1.27, bursts(JOLTS))
    sizes = how_loud(2.6 * np.minimum(rng.exponential(1, N), 3))
    taps = sizes * (rng.random(N) < (150 + .8 * hz) / SR)
    drive = evened(taps * rng.choice([-1, 1], N)) + .55 * noise()
    below = (GRID / 620) ** 4
    no_bass = below / (1 + below)
    on_floor = coloured(drive, rings(BODY_ON_FLOOR, GRID) * no_bass)
    held = coloured(drive, rings(BODY_HELD, GRID) * no_bass)
    lifted = during(LIFTED, .08)
    return level * (lifted * held * how_loud(-6.5) + (1 - lifted) * on_floor)


def room(x):
    taps = np.zeros(SR // 2)
    at = np.arange(200, len(taps) - 20, 20)
    taps[at + rng.integers(0, 20, len(at))] = rng.choice([-1., 1.], len(at))
    hz, t, z = signal.stft(taps, SR, nperseg=256)
    t60 = read([(500, 0.52), (3000, 0.57), (9000, 0.2)], hz)[:, None]
    tail = signal.istft(z * how_loud(-60 * t / t60), SR, nperseg=256)[1]
    return signal.fftconvolve(x, tail / np.linalg.norm(tail))[:N]


def hum_and_air():
    hum = how_loud(-49) * coloured(noise(), rings(HUM_RINGS, GRID))
    return hum + how_loud(-52.5) * coloured(noise(), how_loud(read(AIR_SPECTRUM, GRID)))


def buzz():
    cycle = (TIME * 60 + 0.81) % 1
    pairs = 1.1 * np.exp(-((cycle - .1) / .04) ** 2) + np.exp(-((cycle - .35) / 0.032) ** 2)
    return how_loud(-63) * coloured(pairs * noise(), rings([(6000, 1900, 0)], GRID) ** 2)


def holding_hand():
    lumps = noise() * how_loud(2.5 * drift(1200))
    steady = how_loud(-50 - 3.5 * np.clip((TIME - 8.18) / 0.4, 0, 1))
    shifts = bursts([(s, db, 0.25) for s, db in SHIFTS])
    out = np.hypot(steady, shifts) * coloured(lumps, how_loud(read(TREMOR_SPECTRUM, GRID)))
    for s, db, span in SWAYS:
        u = (TIME - s) / (2 * span)
        out += how_loud(db) * (2 * u ** 2 - 1) * np.exp(-u ** 2)
    return out


def clacks():
    out, t = np.zeros(N + 8000), np.arange(8000) / SR
    hits = CLACKS + [(*row, 0.022, -2.5) for row in BUMPS]
    hits = hits + [(s, db - 3, hz, 0.011, -2) for s, db, hz in SLAPS]
    contact = np.minimum(t / 0.00058, 1)
    for s, db, hz, t60, crack_db in hits:
        ring = np.sin(2 * np.pi * hz * t) * how_loud(-60 * t / max(t60, .004))
        modes = zip(900 * 7 ** rng.random(4), rng.random(4))
        sides = sum(np.sin(2 * np.pi * (f * t + p)) for f, p in modes) * how_loud(-60 * t / 0.018)
        dull = np.convolve(rng.standard_normal(len(t)), np.hanning(10) / 4.5)
        crack = np.diff(dull, prepend=0)[:len(t)] * np.exp(-t / .003)
        hit = 0.91 * ring + 0.4 * how_loud(crack_db / 2) * sides + 2.0 * how_loud(crack_db) * crack
        out[round(s * SR):][:8000] += how_loud(db) * contact * hit
    return out[:N]


def thumps():
    out, t = np.zeros(N + 8000), np.arange(8000) / SR
    push = (1 - t / 0.011) * t / 0.0042 * np.exp(-t / 0.0069)
    for s, db, hz, t60 in THUMPS:
        ring = -np.sin(2 * np.pi * hz * t) * how_loud(-60 * t / max(t60, .005)) * np.minimum(t / 0.00062, 1)
        out[round(s * SR):][:8000] += how_loud(db) * (ring + how_loud(-12) * push)
    return out[:N]


def squeak():
    hz, level_db = columns(SQUEAK)
    turns = np.cumsum(hz * (1 + 0.0064 * drift(60))) / SR
    catching = 1 + .1 * drift(80)
    for s, half, depth in SQUEAK_GAPS:
        catching -= depth * np.exp(-((TIME - s) / half) ** 2)
    out = how_loud(level_db + 4.0) * catching * np.sin(2 * np.pi * turns) * during(SQUEAK, 0.002)
    for a, b, from_hz, to_hz, db in STRANDS:
        glide = np.linspace(from_hz, to_hz, round((b - a) * SR))
        tone = np.sin(2 * np.pi * np.cumsum(glide) / SR)
        out[round(a * SR):][:len(glide)] += how_loud(db + 4.0) * np.sqrt(np.hanning(len(glide))) * tone
    return out


def rubs():
    grain = noise() * how_loud(1.1 * drift(60))
    hiss, out = coloured(grain, how_loud(read(RUB_SPECTRUM, GRID))), np.zeros(N)
    lumps = how_loud(1.5 * drift(500))
    for (s, length, db, fall_db), (hz, width, hiss_db) in zip(RUBS, RUB_TONES):
        now = slice(round(s * SR), round((s + length) * SR))
        along = (TIME[now] - s) / length
        hollow = coloured(grain[now], rings([(hz, width, 0)], GRID))[:len(along)]
        stroke = evened(hollow + how_loud(hiss_db) * hiss[now])
        edge_s = max(.014, 0.16 * length)
        edges = np.clip(np.minimum(along, 1 - along) * length / edge_s, 0, 1)
        out[now] += how_loud(db + fall_db * along) * edges * lumps[now] * stroke
    return out


def creak():
    hz, level_db = columns(CREAK)
    turns = np.cumsum(hz * (1 + .12 * drift(120))) / SR
    harmonics = sum(np.sin(2 * np.pi * k * turns) / k ** 2.34 for k in range(1, 6))
    return how_loud(level_db - 1.0) * harmonics * during(CREAK, 0.0042)


def scene():
    truck = gears() + tyres() + squeak() + creak()
    hits = clacks() + thumps()
    echoes = room(how_loud(-11) * truck + how_loud(-16) * hits)
    background = hum_and_air() + buzz() + holding_hand()
    return (truck + hits + echoes + rubs() + background)[None]


def band_limit(x):
    return signal.sosfilt(signal.butter(12, 11180, fs=SR, output="sos"), x)


def record(dry):
    low_pass = signal.firwin(511, 10950, window=("kaiser", 10), fs=SR)
    limited = signal.oaconvolve(dry, low_pass[None], "same")
    return band_limit(0.91 * np.tanh(limited / 0.92))


dry = scene()
out = record(dry)
wav_record(out)
```